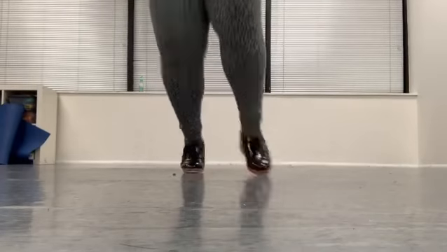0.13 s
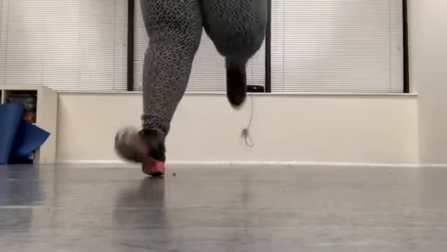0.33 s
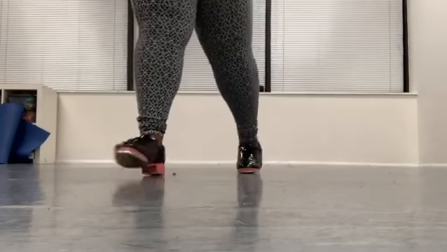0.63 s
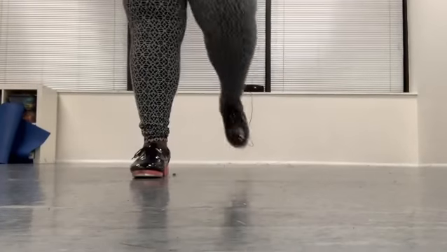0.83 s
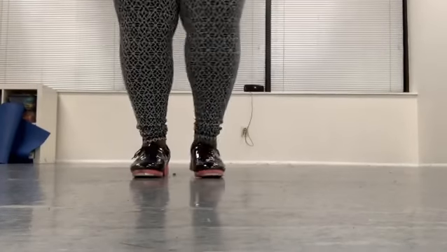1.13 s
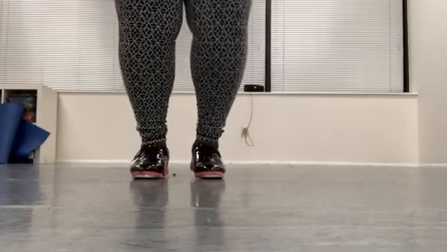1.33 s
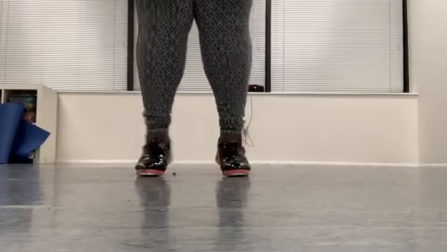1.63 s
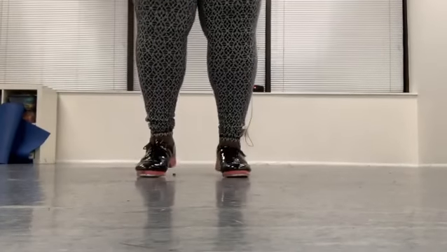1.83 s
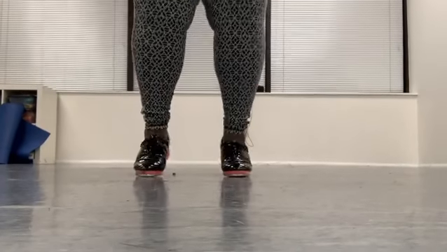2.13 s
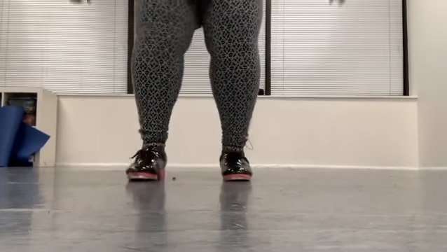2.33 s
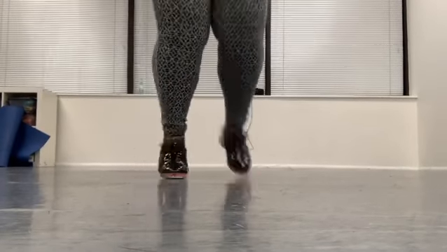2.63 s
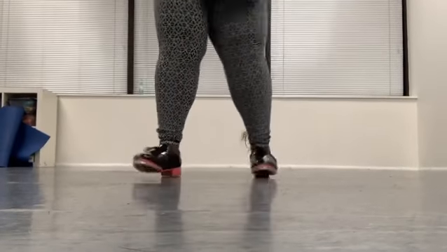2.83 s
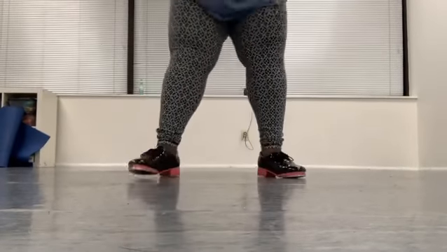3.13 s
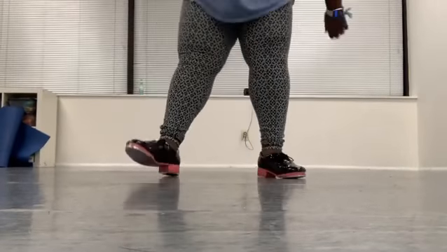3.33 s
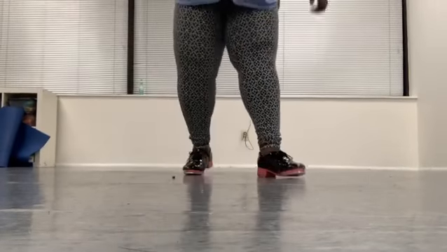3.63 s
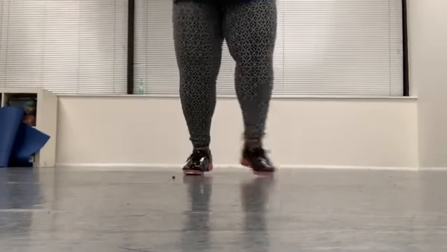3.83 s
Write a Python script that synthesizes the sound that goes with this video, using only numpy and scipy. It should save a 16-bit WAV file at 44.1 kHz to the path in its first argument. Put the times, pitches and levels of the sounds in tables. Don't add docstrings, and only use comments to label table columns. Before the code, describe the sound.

Metal-plated tap shoes crack out irregular steps on a wooden floor in an echoing bare room.

```python
import sys
import numpy as np
from scipy import signal
from scipy.fft import rfft, irfft
from scipy.io import wavfile
from scipy.ndimage import uniform_filter1d

SR = 44100
rng = np.random.default_rng(int(sys.argv[2]) if len(sys.argv) > 2 else 0)


def attenuation_scalar(level_db):
    decades = np.asarray(level_db, float) / 20
    return 10 ** decades


def bounce(signal):
    frames = np.transpose(np.atleast_2d(signal))
    limited = np.clip(frames, -1, 1)
    pcm = np.round(limited * 32767).astype(np.int16)
    wavfile.write(sys.argv[1], SR, pcm)


N = 176400

# start_s, crack_db, boom_db, thud_db, tick_db
TAPS = [(0.054, -4.5, -36.5, -28.5, -20.5), (0.2052, -5.5, -18, -17, -22), (0.3307, -5, -30, -16.5, -27),
        (0.394, -8.5, -19.5, -25, -38.5), (0.469, -3.5, -8, -17.5, -19.5), (0.5265, -2, -15, -13, -57.5),
        (0.779, -8, -11, -21.5, -21.5), (1.0914, -2.5, -17, -16.5, -28), (1.684, -3.5, -23.5, -17, -29),
        (1.692, -2, -30.5, -22, -22.5), (2.2831, -5, -9.5, -11, -21.5), (2.556, -1, -27, -22, -33.5),
        (2.618, -14, -20.5, -24, -27.5), (2.659, -15, -31, -16, -36), (2.745, -8.5, -22.5, -23.5, -29.5),
        (2.8059, -7.5, -19.5, -20, -31.5), (2.867, -16, -14.5, -20, -32), (3.003, -5.5, -21.5, -22, -19),
        (3.0705, -4.5, -15, -21.5, -24.5), (3.5312, -4, -26.5, -21.5, -25.5),
        (3.666, -7.5, -20, -15, -32.5), (3.92, -10, -27, -18, -27)]
# low_ring_hz, mid_ring_hz, high_ring_hz, high_over_low_db, room_send_db
TAP_TONES = [(1930, 1900, 3100, 8, -7.5), (872, 1310, 2200, -4, 4.5), (925, 2400, 3410, 4.5, -4),
             (1280, 2100, 3200, 3.5, -4), (800, 1300, 2880, -8.5, -0.5), (1560, 2700, 4500, 1.5, 0),
             (1150, 3300, 4600, -5, -2), (1346, 2800, 3560, -0.5, 1), (1335, 1700, 3520, 1, 1.5),
             (1090, 3000, 3540, -1, -1), (1464, 1300, 2930, -6.5, 0.5), (1420, 2400, 3570, 2.5, 1.5),
             (890, 1485, 2410, -7, -4.5), (850, 1900, 2510, -9.5, -5), (1500, 1100, 2400, -8, -9.5),
             (984, 2700, 3400, -1.5, 2.5), (970, 2400, 3100, -7.5, 6), (820, 2700, 5860, 0, -9),
             (1380, 2700, 800, -1.5, -2.5), (1530, 1880, 2520, 2, -2), (1400, 2000, 3250, 2, .5),
             (1354, 1900, 2390, -9, 1.5)]
TAP_LOOSENESS = [-9.5, -8.5, -19.5, -9, -5, -15, -7.5, -4, -11, -3.5, -2, -10, -9, -5, -18, -7, -8, -15.5,
                 -11.5, -15, -14.5, -12.5]
# start_s, crack_db, boom_db, thud_db, tick_db
TOUCHES = [(-.02, -1, -16, -15, -38), (0.166, -20.5, -31, -29.5, -68), (.436, -48, -20.5, -19.5, -73),
           (1.553, -55, -48, -55.5, -56), (1.579, -76, -34.5, -41.5, -85.5), (1.112, -61, -19, -30, -80),
           (2.70, -46, -17, -34.5, -54), (2.846, -44, -14.5, -27, -56), (2.892, -50, -22, -43, -70.5),
           (3.319, -62, -57, -62, -42.5), (.70, -60, -29, -32, -84), (0.7733, -26.5, -45, -27.5, -38.5),
           (0.793, -37, -41, -40.5, -37), (3.017, -27, -43, -27.5, -32), (.34, -38, -42, -40.5, -38),
           (2.511, -55, -60, -60, -46)]
# start_s, length_s, level_db
SCUFFS = [
    (1.56, 0.048, -45.5),
    (1.668, 0.013, -36),
    (2.49, .05, -61.5),
]
# mode_hz, level_db, t60_s
BOARD_MODES = [(54.25, -27.5, .12), (72.4, 14, 0.14), (130, -4.5, 0.024), (217.6, -9, 0.12),
               (336, -14, 0.11)]
# freq_hz, level_db
PLATE_SPECTRUM = [(800, 0), (1300, 2.5), (1800, -1.5), (2300, 0.5), (3200, -2.5), (4200, -12), (5500, -34)]
# freq_hz, level_db
TICK_SPECTRUM = [(3500, -1), (5000, -3), (6500, -1), (8000, -8), (10000, -8.5), (13000, -15.5),
                 (14300, -40)]
# freq_hz, level_db
THUD_SPECTRUM = [(100, -26.5), (170, 1), (320, 6.5), (500, 1.5), (750, -10), (1100, -30)]
# freq_hz, level_db
BOOM_SPECTRUM = [(25, -32), (45, -14.5), (72, -2.5), (110, 9), (160, -3)]
# freq_hz, t60_s
ROOM_T60 = [(60, 0.75), (130, 0.43), (350, 0.66), (900, 0.53), (2500, 0.87), (6000, 0.69), (13500, 0.59)]
# freq_hz, level_db
ROOM_LEVEL = [(70, -6), (130, -3), (350, 3), (900, 2.5), (1600, -3.5), (3000, 2), (6000, 1), (13000, -3.5)]
# freq_hz, likeness_0_to_1
ROOM_LIKENESS = [(60, 1), (150, 1), (600, 0.15), (1500, 0), (4000, 0.3), (8000, 0.8), (13000, 1)]
# delay_s, level_db, pan_left_over_right_db
ECHOES = [
    (.009, -10.5, -9),
    (0.021, -12.5, -9.5),
    (0.024, -12.5, 8.5),
    (0.03, -17, -5.5),
]
# freq_hz, density_db_per_hz
HUM_SPECTRUM = [(25, -19.5), (72, 3), (130, -10), (330, -4.5), (800, -19), (3000, -17), (9000, -37)]
# freq_hz, left_lead_rad
PORT_PHASE = [(60, 0.46), (900, 0.85), (4600, 1.03), (5600, -1.5), (10500, -2.5), (11200, 7.5)]
# freq_hz, left_over_right_db
PORT_BALANCE = [(60, 0.5), (250, -1), (1000, -1), (3000, 2), (8000, 0.5)]
# freq_hz, threshold_over_middle_db
GATE_THRESHOLD = [(4000, -19), (6000, -24), (8000, -24), (11500, -29), (14000, -18)]

CRACK_DB, TICK_DB, THUD_DB, BOOM_DB = -4, 10.5, 7, 4
BOARD_RING_DB, COLOUR_DB = -4.5, 2
LAG_1K_S, LAG_POWER, LEAD_S = 0.0022, 0.95, 0.01
PLATE_T60_S, PLATE_RING_DB = 0.016, 8
RATTLES, RATTLE_S, RATTLE_FADE_DB_PER_S = 8, 0.0035, 2200
GRIT_DB, GRIT_TREBLE_DB = 3.5, -11.5
ROOM_RISE_S, ROOM_CLUMP_DB, SPOTS = 0.01, 2, 6
HUM_DB = -58.5
GATE_SPREAD_DB, ATTACK_DB, ATTACK_S = 5.5, 8, 0.003
TOP_HZ, LIMIT = 13600, 1.1
PAD, SIZE = 4410, 16384
BLOW_HZ = np.arange(SIZE // 2 + 1) * SR / SIZE


def curve(table, hz):
    t = np.array(table)
    return np.interp(np.log(np.maximum(hz, 1)), np.log(t[:, 0]), t[:, 1])


def shape(table, hz):
    (lo_hz, lo_db), (hi_hz, hi_db) = table[0], table[-1]
    below = [(lo_hz / 4, lo_db - 40)]
    above = [(hi_hz * 2, hi_db - 40), (hi_hz * 16, hi_db - 130)]
    return attenuation_scalar(curve(below + list(table) + above, hz))


def tap(crack_db, boom_db, thud_db, tick_db, low_hz=1300, mid_hz=2300, high_hz=3300,
        tilt_db=0, room_db=-3, loose_db=-12):
    sweep = board_sweep()
    knots_hz = np.geomspace(100, 14000, 12)
    colour_db = COLOUR_DB * rng.standard_normal(12)
    colour = attenuation_scalar(np.interp(np.log(BLOW_HZ + 1), np.log(knots_hz), colour_db))
    floor = floor_blow(boom_db, thud_db, colour, sweep)
    metal = plate_blow(crack_db, tick_db, tilt_db, sweep)
    ring = plate_ring(low_hz, mid_hz, high_hz)
    near = floor + metal * plate_rattle(loose_db) * colour * ring
    far = floor + metal * attenuation_scalar(room_db) * ring ** 0.14
    return irfft(np.array([near, far]) * sweep)


def board_sweep():
    khz = np.maximum(BLOW_HZ, 25) / 1000
    rest = 1 - LAG_POWER
    lag_cycles = 1000 * LAG_1K_S * (khz ** rest - 1) / rest
    return np.exp(-2j * np.pi * (lag_cycles + BLOW_HZ * LEAD_S))


def unit_peak(spectrum, sweep):
    return spectrum / np.abs(irfft(spectrum * sweep)).max()


def plate_blow(crack_db, tick_db, tilt_db, sweep):
    octaves = np.log2(np.maximum(BLOW_HZ, 25) / 2000)
    plate = shape(PLATE_SPECTRUM, BLOW_HZ) * attenuation_scalar(tilt_db * np.clip(octaves, -0.5, 0.5))
    crack = attenuation_scalar(crack_db + CRACK_DB) * unit_peak(plate, sweep)
    tick = attenuation_scalar(tick_db + TICK_DB) * unit_peak(shape(TICK_SPECTRUM, BLOW_HZ), sweep)
    return crack + tick


def plate_ring(low_hz, mid_hz, high_hz):
    def mode(mode_hz):
        return 1 / (1 + 2j * np.pi * (BLOW_HZ - mode_hz) * PLATE_T60_S / np.log(1000))
    return 1 + attenuation_scalar(PLATE_RING_DB) * (mode(low_hz) - mode(mid_hz) + mode(high_hz))


def plate_rattle(loose_db):
    at_s = RATTLE_S * (rng.random(RATTLES) * 1.7 - 0.8)
    spread_db, sign = rng.standard_normal((2, RATTLES))
    strikes = attenuation_scalar(loose_db + 3 * spread_db - RATTLE_FADE_DB_PER_S * np.abs(at_s)) * np.sign(sign)
    at_s, strikes = np.r_[0, at_s], np.r_[1, strikes]
    rattle = strikes @ np.exp(-2j * np.pi * np.outer(at_s, BLOW_HZ))
    return rattle / np.linalg.norm(strikes)


def floor_blow(boom_db, thud_db, colour, sweep):
    t = np.arange(SIZE) / SR
    ring = np.zeros(SIZE)
    for mode_hz, db, t60_s in BOARD_MODES:
        level = attenuation_scalar(db + 2 * rng.standard_normal())
        ring += level * np.sin(2 * np.pi * mode_hz * t) * 1000. ** (-t / t60_s)
    ring = rfft(ring)
    ring /= np.sqrt(np.mean(np.abs(ring[:SIZE // 60]) ** 2))
    boom = attenuation_scalar(boom_db + BOOM_DB) * unit_peak(shape(BOOM_SPECTRUM, BLOW_HZ), sweep)
    thud = attenuation_scalar(thud_db + THUD_DB) * unit_peak(shape(THUD_SPECTRUM, BLOW_HZ) * colour, sweep)
    return (boom + thud) * (1 + attenuation_scalar(BOARD_RING_DB) * ring)


def scuff(length_s, level_db):
    n = int(length_s * SR)
    uneven = attenuation_scalar(GRIT_DB * rng.exponential(size=n))
    grit = rng.standard_normal(n) * uneven * np.linspace(0.2, 1, n)
    hz = np.arange(n // 2 + 1) * SR / n
    colour = shape(PLATE_SPECTRUM, hz) + attenuation_scalar(GRIT_TREBLE_DB) * shape(TICK_SPECTRUM, hz)
    y = irfft(rfft(grit) * colour, n)
    return y * attenuation_scalar(level_db) / y.std()


def room():
    n = SR
    t, hz = np.arange(n) / SR, np.arange(n // 2 + 1.)
    noise, out = rfft(rng.standard_normal((2, n))), np.zeros((2, n))
    opposed = np.array([[1], [-1]])
    for k in range(19):
        centre_hz = 30 * 2 ** (k / 2)
        band = np.clip(1 - np.abs(2 * np.log2(hz / centre_hz + 1e-9)), 0, 1)
        env = 1000. ** (-t / curve(ROOM_T60, centre_hz))
        env *= 1 - np.exp(-(t / ROOM_RISE_S) ** 0.68)
        env *= attenuation_scalar(ROOM_CLUMP_DB * np.interp(t, np.arange(80) / 80, rng.standard_normal(80)))
        level = attenuation_scalar(curve(ROOM_LEVEL, centre_hz)) / np.sqrt(np.sum(env ** 2))
        mid, side = irfft(noise * band) * env * level
        like = np.clip(curve(ROOM_LIKENESS, centre_hz), 0, 1)
        out += np.sqrt((1 + like) / 2) * mid + np.sqrt((1 - like) / 2) * side * opposed
    for delay_s, db, pan_db in ECHOES:
        i = int(delay_s * SR * (1 + 0.074 * rng.standard_normal()))
        burst = rng.standard_normal(90) * np.hanning(90) / 6
        out[:, i:i + 90] += attenuation_scalar(db + opposed * pan_db / 2) * burst
    return out


def hum():
    gain = attenuation_scalar(curve(HUM_SPECTRUM, np.arange(N // 2 + 1) * SR / N))
    y = irfft(rfft(rng.standard_normal((2, N))) * gain, N)
    return y * attenuation_scalar(HUM_DB) / y.std()


def scene():
    length = N + PAD + SIZE
    direct, sent = np.zeros(length), np.zeros((SPOTS, length))
    full = [(*blow, *tones, loose) for blow, tones, loose in zip(TAPS, TAP_TONES, TAP_LOOSENESS)]
    for k, (start_s, *settings) in enumerate(full + TOUCHES):
        i = int((start_s - LEAD_S) * SR) + PAD
        near, far = tap(*settings)
        direct[i:i + SIZE] += near
        sent[k % SPOTS, i:i + SIZE] += far
    for start_s, length_s, db in SCUFFS:
        y, i = scuff(length_s, db), int(start_s * SR) + PAD
        direct[i:i + len(y)] += y
        sent[0, i:i + len(y)] += y / 2
    wet = sum(signal.fftconvolve(x[None], room(), axes=1)[:, :length] for x in sent)
    return (direct + wet)[:, PAD:PAD + N] + hum()


def thin(x):
    hz, _, z = signal.stft(np.array([x[0] + x[1], x[0] - x[1]]) / 2, SR, nperseg=2048)
    power, band = np.abs(z) ** 2 + 1e-20, (hz // 345).astype(int)
    middle = power[:, (hz > 1000) & (hz < 4000)].mean(axis=1).max(axis=0)
    chance = rng.standard_normal((2, band.max() + 1, z.shape[2]))
    chance = uniform_filter1d(chance, size=2, axis=2) * np.sqrt(2)
    for b in range(11, band.max() + 1):
        inside = band == b
        edge_db = curve(GATE_THRESHOLD, hz[inside].mean()) + GATE_SPREAD_DB * chance[:, b]
        is_open = power[:, inside].mean(axis=1) > middle * attenuation_scalar(2 * edge_db)
        z[:, inside] *= is_open[:, None]
    mid, side = signal.istft(z, SR, nperseg=2048)[1][:, :N]
    sharp, k = np.diff(x[0], prepend=0) ** 2, int(ATTACK_S * SR)
    blow = uniform_filter1d(sharp, k) > attenuation_scalar(ATTACK_DB) * uniform_filter1d(sharp, 12 * k)
    keep = np.clip(2 * uniform_filter1d(blow * 1., k), 0, 1)
    return keep * x + (1 - keep) * np.array([mid + side, mid - side])


def band_limit(x):
    return signal.sosfilt(signal.butter(12, 14420, fs=SR, output="sos"), x)


def record(dry):
    hz = np.arange(N // 2 + 1) * SR / N
    half = attenuation_scalar(curve(PORT_BALANCE, hz) / 2)
    ports = np.array([half, np.exp(-1j * curve(PORT_PHASE, hz)) / half])
    low_pass = 1 / np.sqrt(1 + (hz / TOP_HZ) ** 40)
    x = irfft(rfft(dry) * low_pass * ports, N)
    rounded = LIMIT * np.tanh(x / LIMIT)
    return band_limit(thin(rounded))


dry = scene()
out = record(dry)
bounce(out)
```